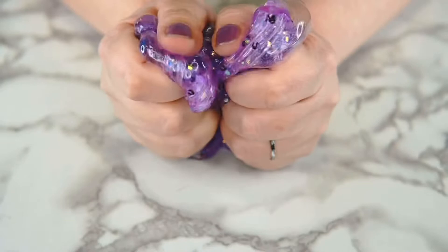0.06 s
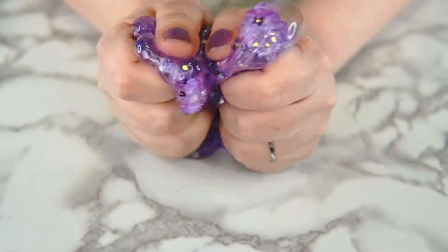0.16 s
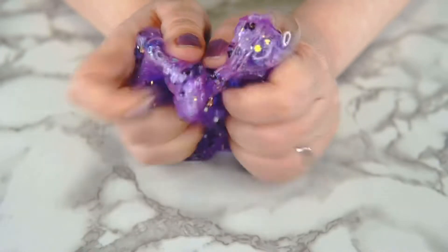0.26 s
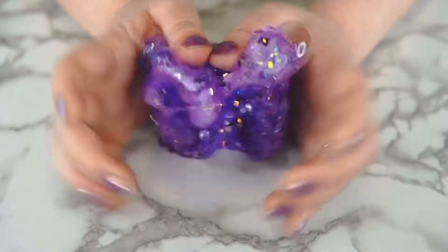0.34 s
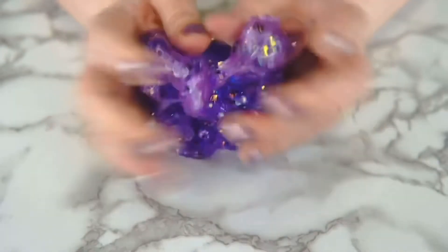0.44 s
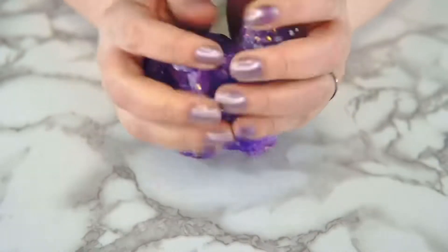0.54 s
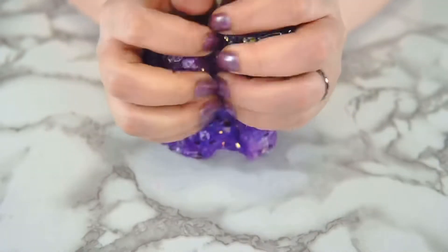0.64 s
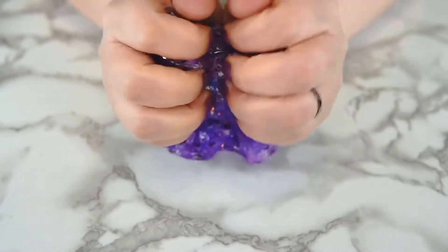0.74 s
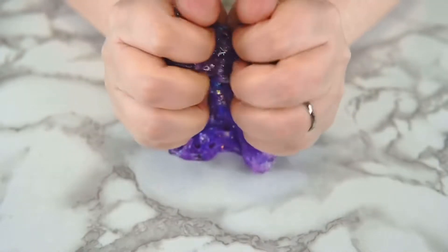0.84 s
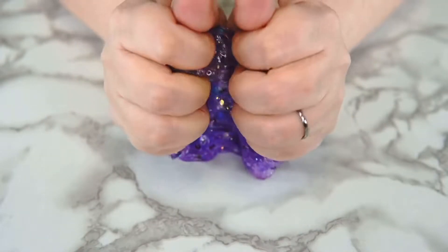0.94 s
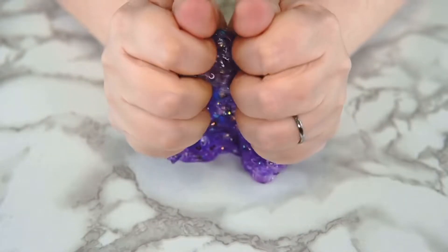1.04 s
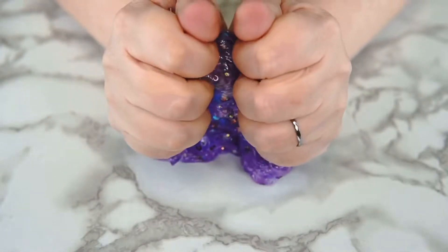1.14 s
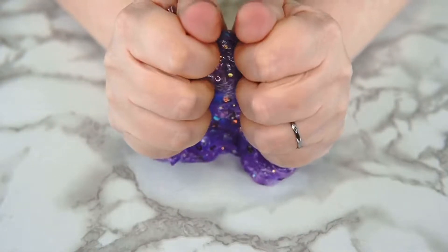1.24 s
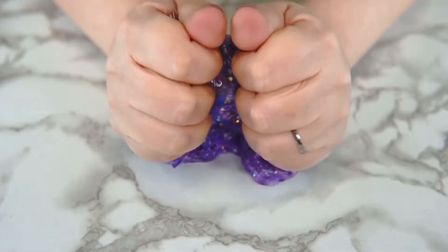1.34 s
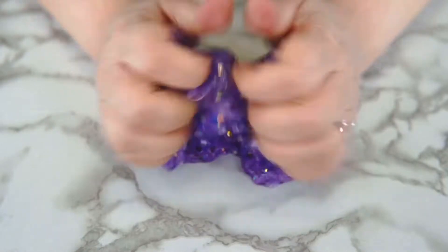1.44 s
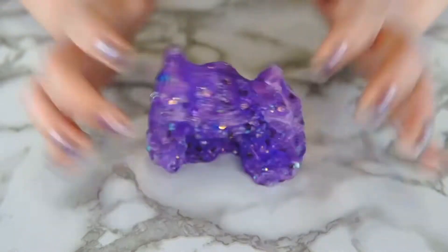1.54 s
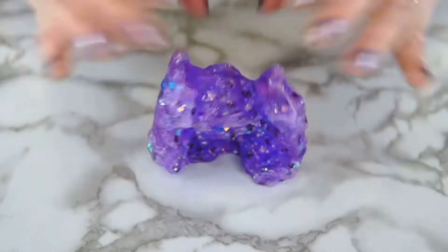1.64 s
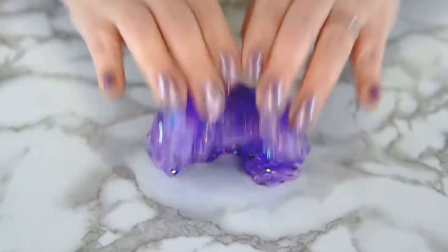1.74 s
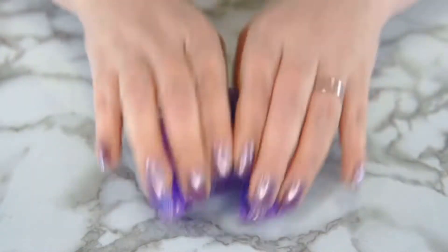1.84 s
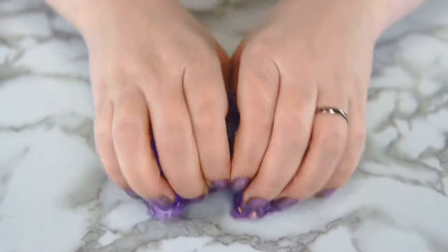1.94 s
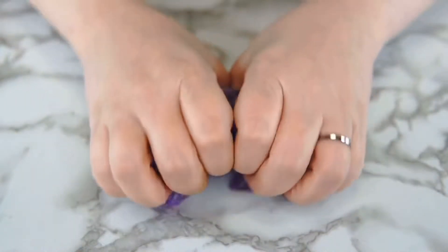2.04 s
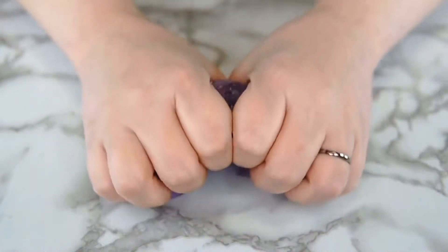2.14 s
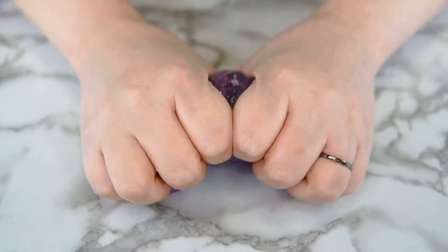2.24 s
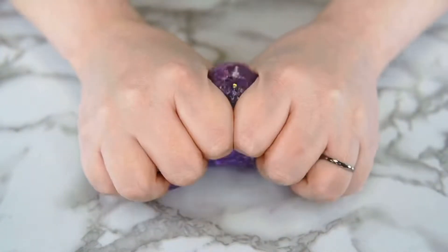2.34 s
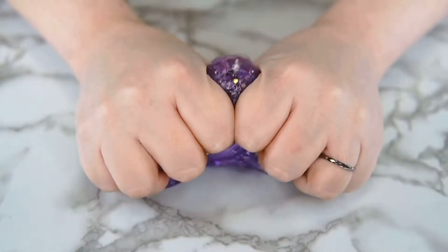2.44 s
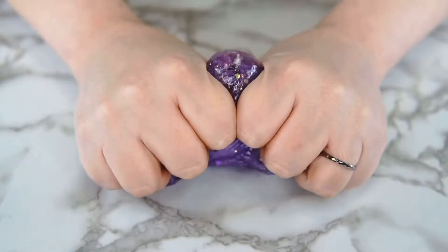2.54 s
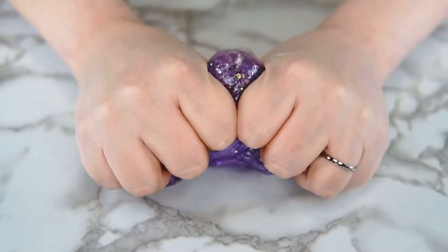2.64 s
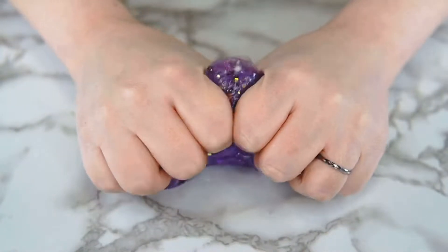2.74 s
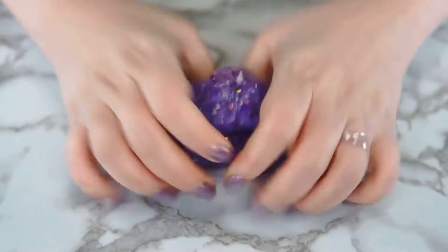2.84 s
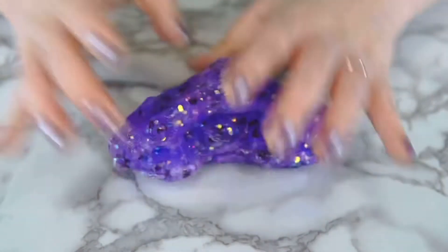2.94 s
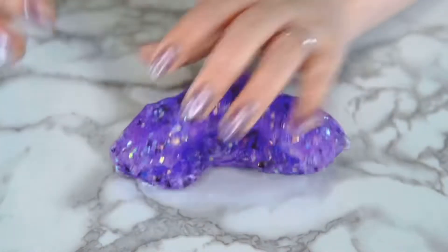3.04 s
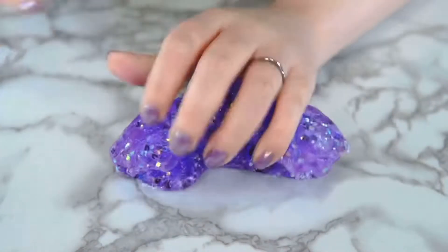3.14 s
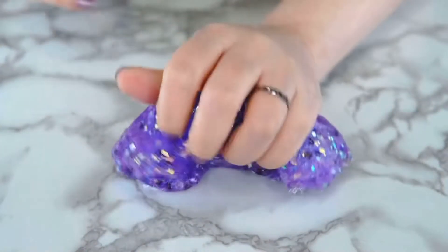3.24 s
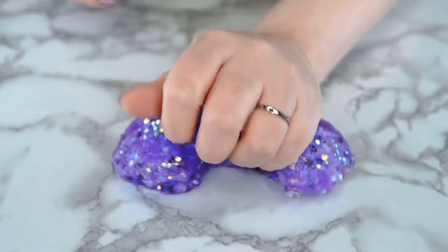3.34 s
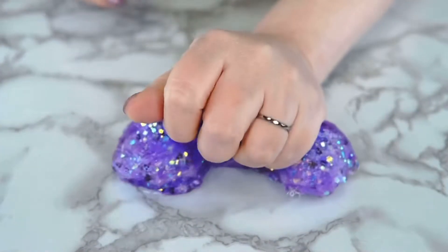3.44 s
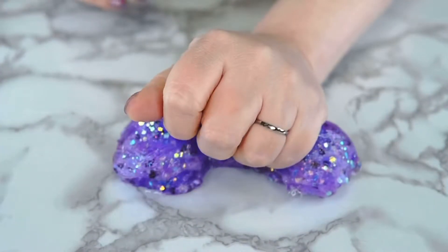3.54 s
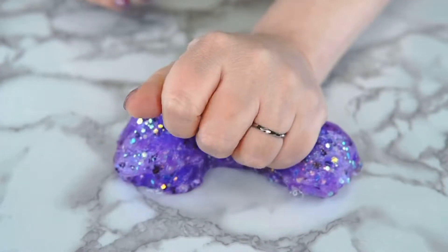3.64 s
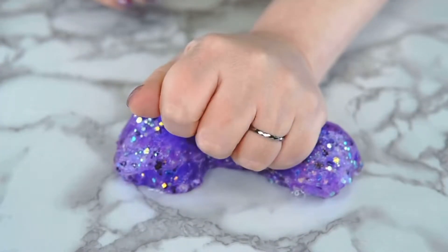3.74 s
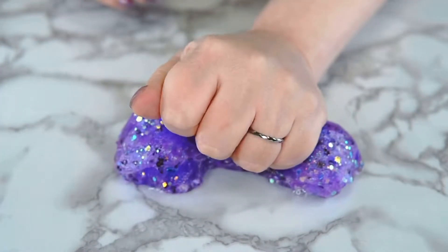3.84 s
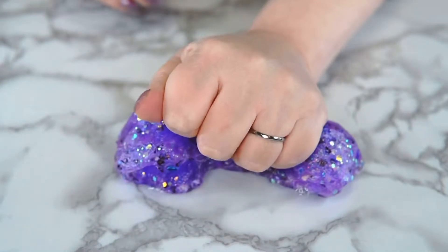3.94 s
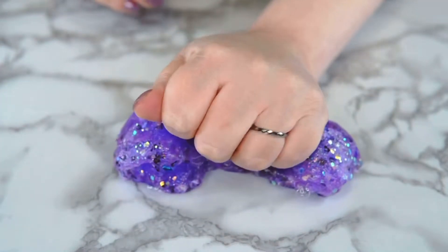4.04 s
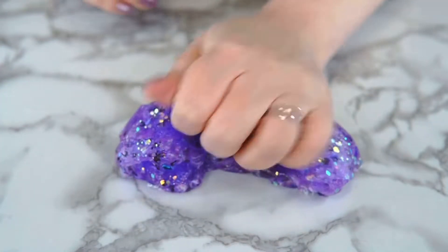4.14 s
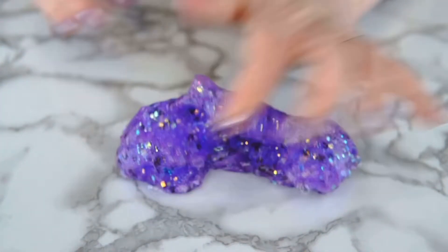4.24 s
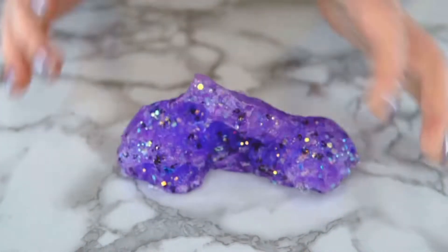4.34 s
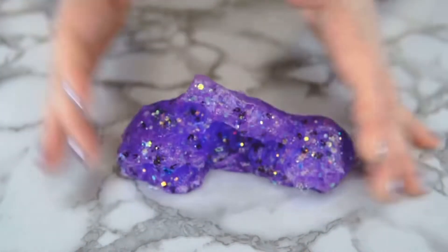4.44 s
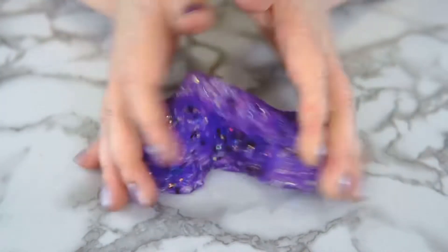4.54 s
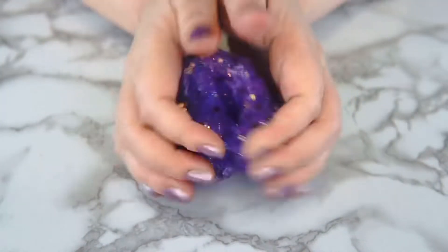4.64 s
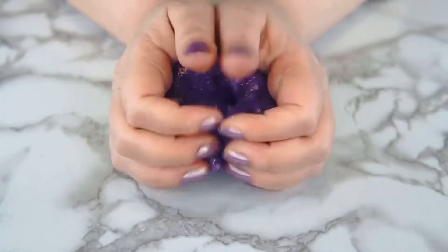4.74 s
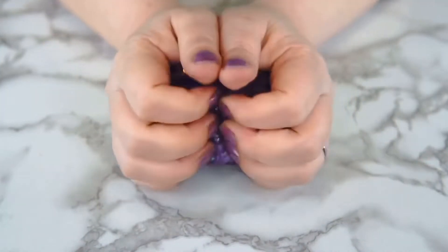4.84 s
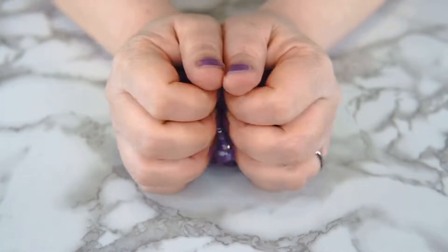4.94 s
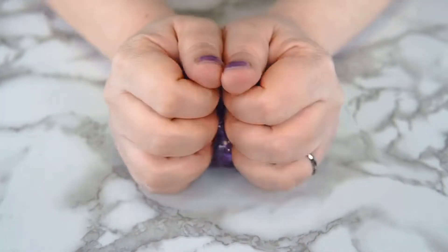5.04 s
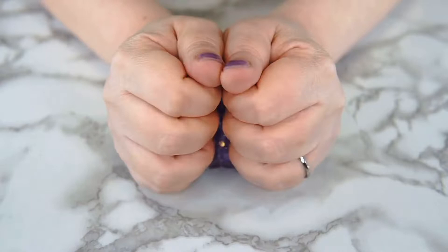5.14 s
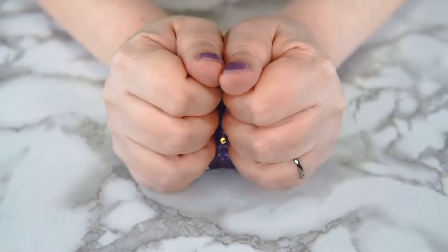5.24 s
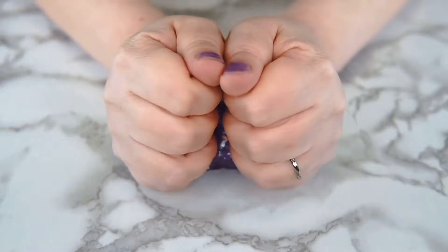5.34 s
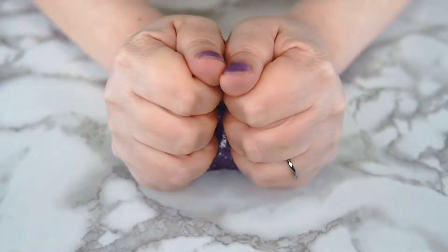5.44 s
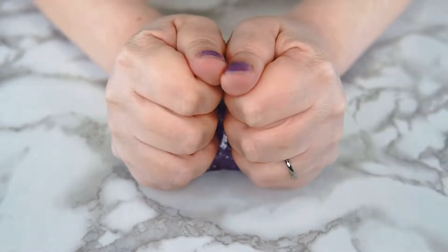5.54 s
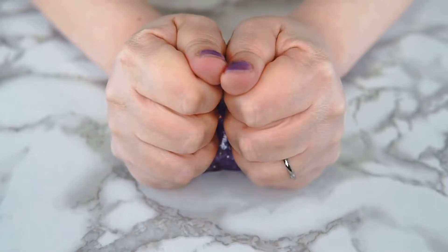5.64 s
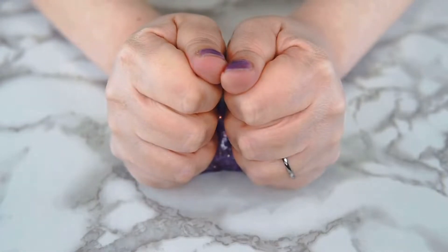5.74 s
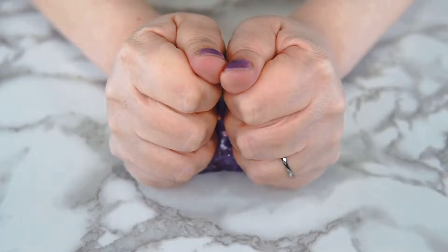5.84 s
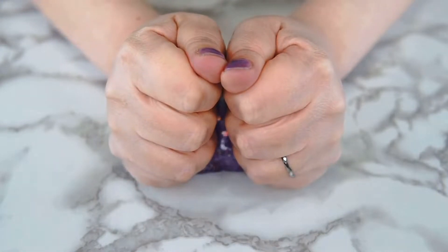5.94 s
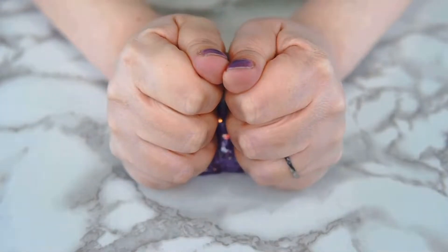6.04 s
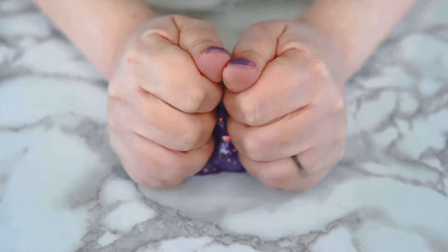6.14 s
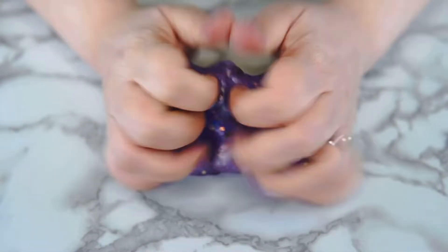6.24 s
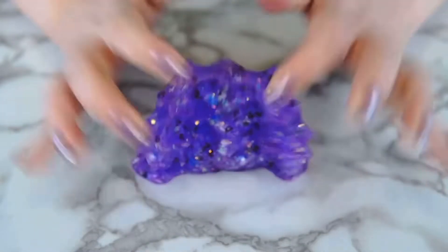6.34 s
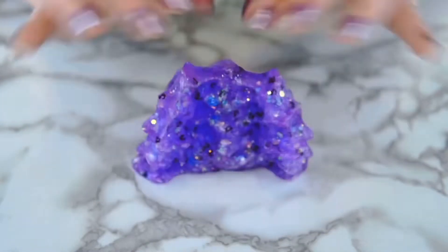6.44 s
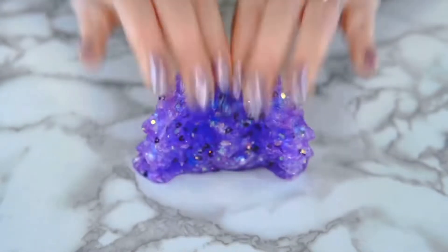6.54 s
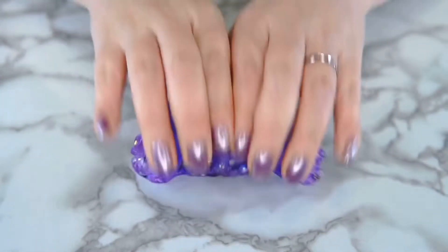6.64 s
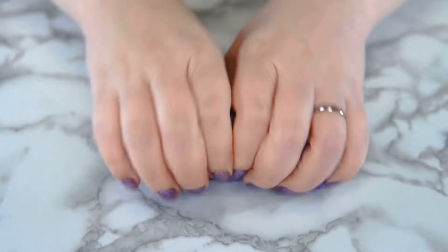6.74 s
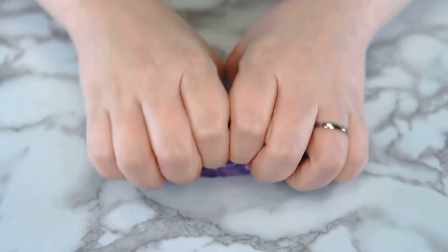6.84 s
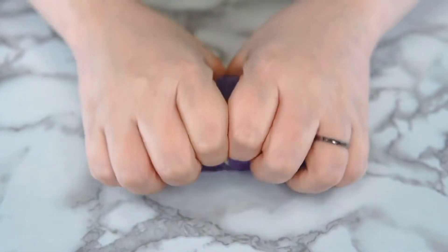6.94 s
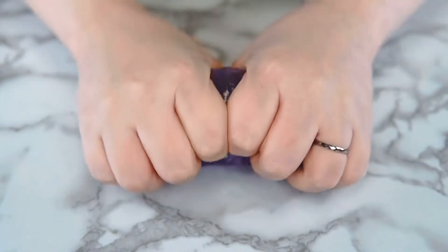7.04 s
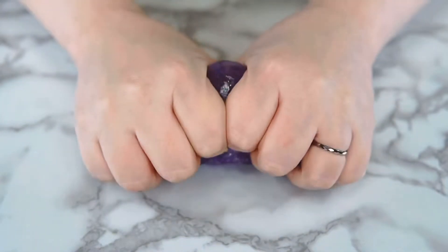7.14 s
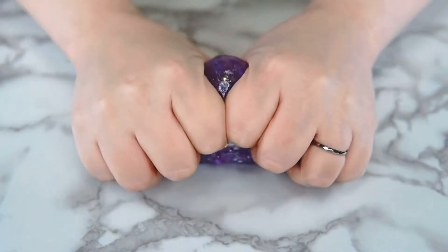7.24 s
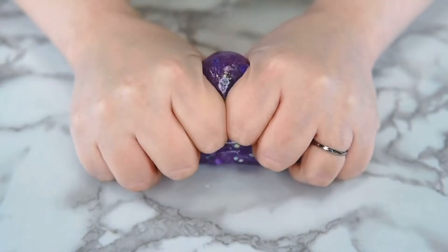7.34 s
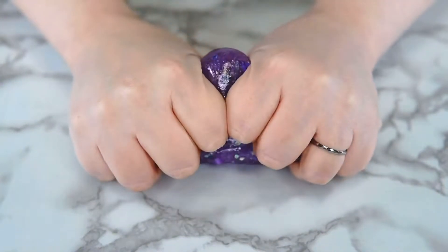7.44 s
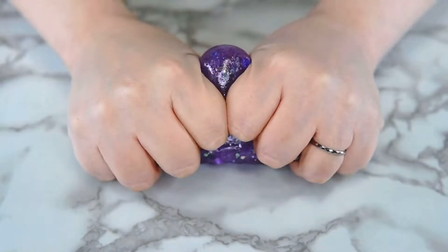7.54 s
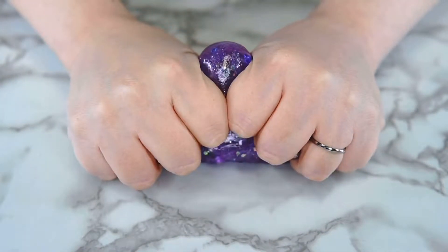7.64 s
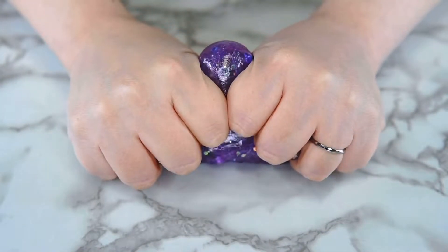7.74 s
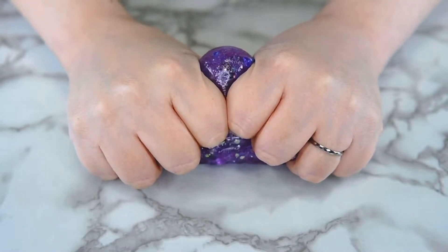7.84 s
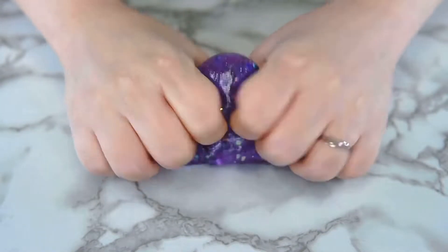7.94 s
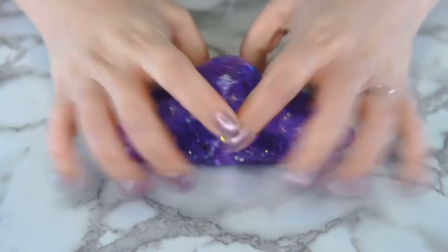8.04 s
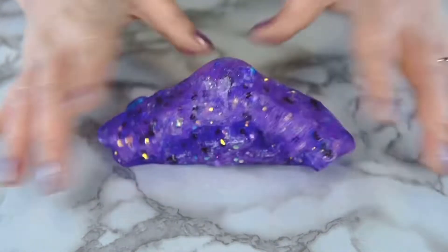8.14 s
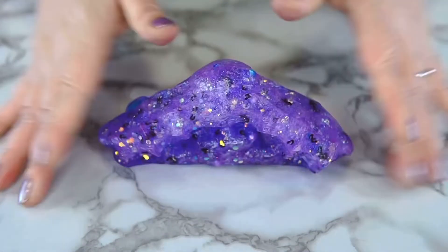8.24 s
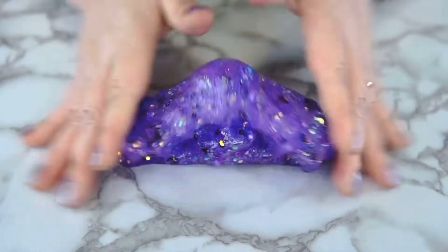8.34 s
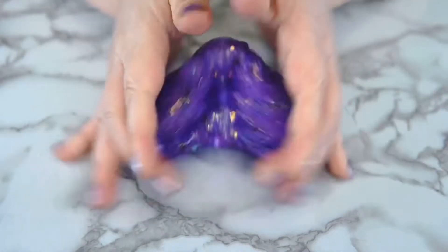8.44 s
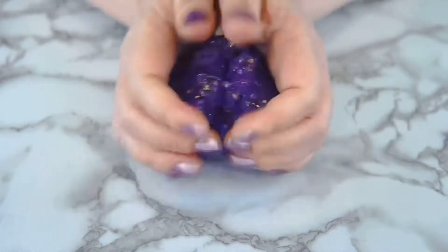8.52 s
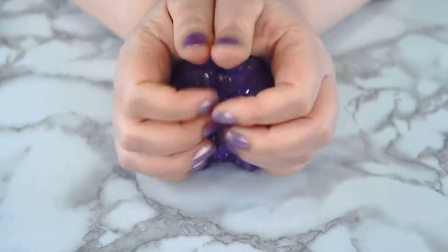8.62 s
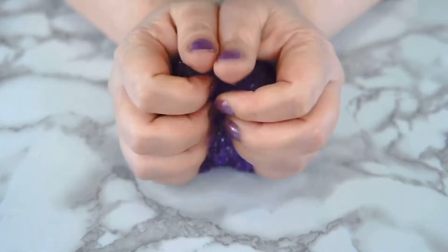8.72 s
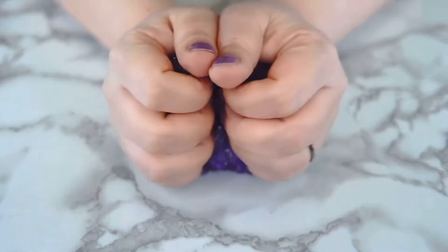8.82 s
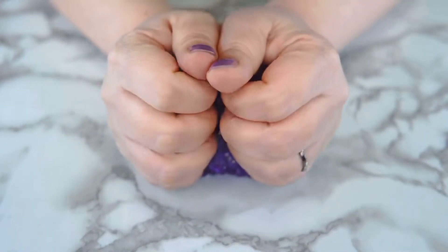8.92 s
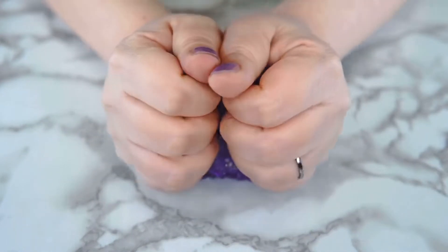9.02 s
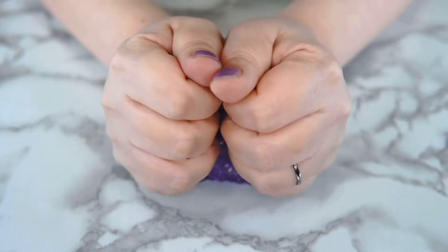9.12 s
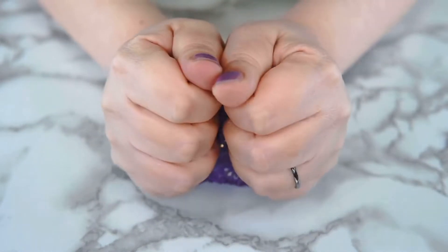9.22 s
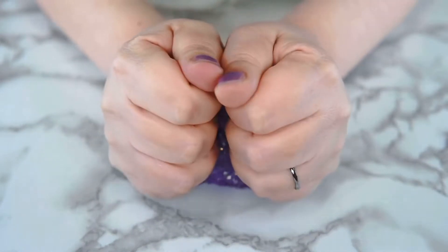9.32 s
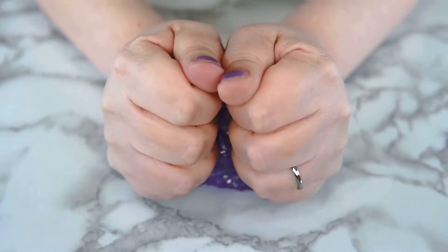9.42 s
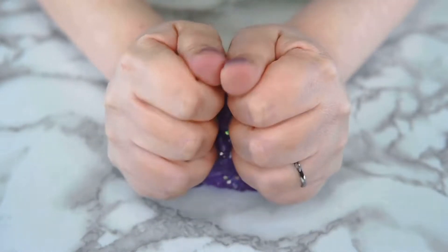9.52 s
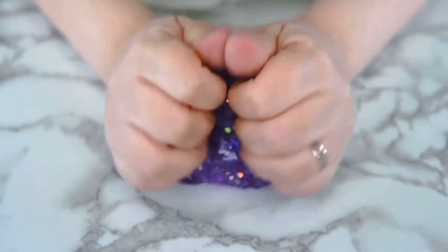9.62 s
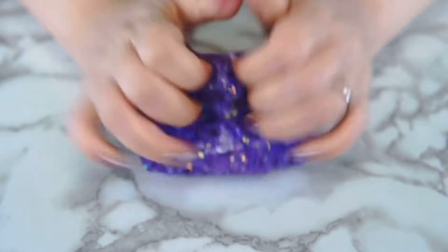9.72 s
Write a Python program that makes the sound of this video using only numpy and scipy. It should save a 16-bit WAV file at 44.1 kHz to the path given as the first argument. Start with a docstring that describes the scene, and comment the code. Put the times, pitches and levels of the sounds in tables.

```python
"""Two hands knead glitter slime on a table, close to a stereo microphone in a small, dry room.
First the fingers peel off the sticky mass: a dense, tearing crackle of short resonant ticks and hiss.
Then a squeeze bursts trapped air pockets: each a sharp snap, a quick falling chirp and a puff of air.
Peels and groups of pops go on in turn, the longest from 4.5 to 6.1 s, the last pops fainter, then a peel.
Faint squelching, soft landings and low thumps under loud pops lie beneath, over a very faint, dark hiss."""
import sys
import numpy as np
from scipy import signal
from scipy.fft import rfft, irfft, next_fast_len
from scipy.io import wavfile
from scipy.ndimage import uniform_filter1d, minimum_filter1d, map_coordinates

SR = 44100
rng = np.random.default_rng(int(sys.argv[2]) if len(sys.argv) > 2 else 0)


def output_pcm(signal):
    """Save a mono or channel-first signal as 16-bit PCM at the path in sys.argv[1].

    Samples are clipped to [-1, 1] before scaling.
    """
    pcm = np.clip(np.atleast_2d(signal).T, -1, 1) * 32767
    wavfile.write(sys.argv[1], SR, np.round(pcm).astype(np.int16))


N = 431298  # samples, about 9.8 s

# The larger air pockets bursting, levels ahead of the trims in pops(). Each row: start in seconds,
# snap level in dB, snap pitch in Hz, chirp level in dB, chirp centre in Hz, chirp spread in octaves,
# room level against the pop in dB.
POPS = [(.652, -59, 6790, -38, 955, 0.55, -2), (0.7127, -39.5, 6700, -17, 800, 0.47, 1.5),
        (0.7158, -51, 6460, -26.5, 2800, 0.14, -3), (0.8086, -17.5, 5730, -15.5, 2350, 0.68, 2.5),
        (0.8503, -32, 7100, -14, 2200, 0.54, 3), (0.8566, -26.5, 6800, -14.5, 2370, 0.57, -7),
        (.933, -27.5, 5300, -19, 1320, 0.43, -5), (.9705, -21.5, 9300, -26.5, 1870, 0.91, -7),
        (0.9865, -4, 7940, -16, 2660, 0.31, -4), (1.0483, -7.5, 8300, -19.5, 2880, 0.19, -6),
        (1.0773, -2, 7540, -22.5, 3380, 0.66, -5.5), (1.1246, -9.5, 8800, -23.5, 2720, 0.37, -6.5),
        (1.1395, -29, 7800, -29, 2680, 0.41, -3), (1.2145, -14.5, 7670, -17.5, 2590, 0.49, -3.5),
        (1.93, -32.5, 7360, -30, 3140, 0.32, 2.5), (1.995, -23, 6600, -25, 3380, 0.53, 5.5),
        (2.01, -17, 9600, -19.5, 2210, 0.43, -3.5), (2.024, -3, 9300, -26, 2640, .8, -4),
        (2.0985, -33, 7900, -37, 2570, .42, 5), (2.1219, -40, 7000, -28.5, 1980, 1.2, 3.5),
        (2.1595, -19, 6100, -14.5, 1800, 0.39, -2.5), (2.1916, -13, 7000, -23.5, 2610, 0.34, -7.5),
        (2.2289, -15, 7000, -34.5, 3420, 0.5, -12.5), (2.3065, -15.5, 5780, -12, 1830, 0.39, -4.5),
        (2.3312, -14, 6630, -30, 2360, .77, 1), (2.3421, -12.5, 8400, -12, 2050, 0.36, -2),
        (2.3849, -27, 7900, -51, 2330, 0.64, -12), (2.4183, -11, 8900, -11, 1930, 0.37, 0),
        (2.449, -18, 7900, -23.5, 2550, 0.66, -4.5), (2.4711, -10, 6470, -30.5, 2500, 0.86, -3.5),
        (2.4736, -10, 6630, -7.5, 2435, 0.45, -3.5), (2.479, -4.5, 8030, -22, 2510, 0.52, -8),
        (2.5159, -15.5, 9500, -18.5, 2720, 0.55, 2.5), (2.7271, -22.5, 8000, -29.5, 2830, 0.3, -2.5),
        (3.334, -17.5, 6900, -28.5, 3190, 0.36, -8.5), (3.447, -36, 9200, -25, 1770, 0.34, -7.5),
        (3.519, -23.5, 6250, -26.5, 1280, 0.49, -0.5), (3.56, -14.5, 6000, -24.5, 3350, 0.7, 6.5),
        (3.5747, -6.5, 8400, -21.5, 2300, 0.9, -14), (3.5776, -38, 6570, -14, 1000, 0.39, -3.5),
        (3.6743, -3.5, 7580, -26.5, 3820, .67, -7), (3.7665, -32.5, 6600, -26, 1550, 0.51, 0.5),
        (3.8008, -33, 8200, -27.5, 3290, 0.27, -7), (3.8735, -34, 6670, -29, 2400, 0.32, -11),
        (4.5644, -18.5, 9200, -31.5, 2330, 0.63, -2.5), (4.6691, -16, 7200, -29, 2330, 0.49, -7),
        (4.6883, -18.5, 7200, -19.5, 2730, 0.28, -6.5), (4.7627, -15.5, 7740, -35.5, 3100, 0.42, -5.5),
        (4.8164, -21, 5230, -14.5, 1450, 0.4, -6.5), (4.819, -45, 6000, -29, 743, 0.62, -1),
        (4.878, -16, 6500, -13, 3060, 0.39, 2), (4.8864, -13, 7060, -22, 2540, 0.62, -12),
        (4.8968, -8, 8800, -26, 3360, 0.5, -7.5), (4.9475, -22.5, 8200, -30.5, 2510, 0.41, -14),
        (4.9993, -37, 6100, -33, 3240, 0.3, -5.5), (5.0427, -37, 6800, -42.5, 3550, 0.3, 13),
        (5.0552, -30, 7000, -29.5, 2900, 0.38, 0), (5.0759, -22, 7300, -22.5, 3010, .26, -7.5),
        (5.102, -23, 10700, -34.5, 2500, 0.61, 4.5), (5.1146, -20, 8850, -41, 2900, 0.66, -13),
        (5.1362, -12, 6800, -16, 2600, .51, -0.5), (5.1407, -13, 6470, -11, 3700, .46, -2),
        (5.1452, -13, 8340, -18.5, 3020, 0.27, -23.5), (5.1477, -40, 6600, -34, 516, 0.59, 1),
        (5.2376, -21, 10200, -28, 2860, 0.4, -2.5), (5.2731, -31, 6060, -26.5, 2590, .88, 1.5),
        (5.3196, -21, 6900, -33, 3500, 0.82, 12), (5.3285, -12.5, 6440, -25.5, 2600, 0.76, -11.5),
        (5.33, -42, 6500, -39, 430, 0.3, -3), (5.3675, -27.5, 7140, -33.5, 3150, 0.29, 7),
        (5.401, -17, 10700, -27, 2560, 0.33, 2), (5.4103, -14, 6100, -13.5, 2930, 0.48, -1.5),
        (5.4529, -8.5, 9300, -18, 2900, 0.41, -3), (5.5171, -49, 7700, -28.5, 2600, 0.45, -4.5),
        (5.5651, -16, 8400, -23.5, 2490, 0.35, -6.5), (5.637, -21.5, 10900, -67, 3250, 0.2, -10),
        (5.7227, -55, 6200, -30.5, 1090, 0.38, -4), (5.7986, -32.5, 11240, -49, 3020, 0.33, -5),
        (5.922, -27, 11840, -44, 3290, 0.2, -4), (6.131, -28.5, 6700, -17.5, 2090, 0.35, -8),
        (6.7468, -40, 6360, -38.5, 3020, 0.39, 0.5), (6.796, -31.5, 6000, -34, 2360, 0.24, -1.5),
        (6.813, -24.5, 8400, -23, 2730, 0.32, -6), (6.8607, -51, 6900, -27.5, 2160, 0.3, -7),
        (6.889, -26, 9800, -42, 2160, 0.24, 0.5), (6.945, -29.5, 6600, -27, 2410, 0.24, 5),
        (6.9645, -19.5, 6100, -28, 2570, 0.5, -2), (7.0133, -15.5, 7250, -32, 2200, 0.47, -1.5),
        (7.023, -31, 7600, -30, 1930, .45, -3), (7.0474, -20, 7700, -31.5, 3060, 0.67, -3),
        (7.0887, -4, 7970, -26, 2540, 0.53, -14.5), (7.1385, -50, 7040, -29, 1840, 0.52, 1.5),
        (7.1832, -25.5, 7260, -30.5, 2830, 0.39, -12), (7.251, -14, 10440, -53.5, 3500, .3, -4),
        (7.3993, -3, 7400, -23.5, 2320, 0.86, -7), (7.4485, -28.5, 5570, -16.5, 2600, 0.33, 4),
        (7.51, -12, 8370, -34.5, 3360, .77, -8.5), (7.5175, -22.5, 6900, -23, 2330, 0.52, -6.5),
        (7.5786, -9, 7220, -22, 3530, 0.26, -1), (7.6853, -62, 6970, -48, 2290, 0.36, -22),
        (7.856, -31.5, 7900, -51, 2420, .38, -5), (8.5647, -42, 5660, -36, 2340, 0.25, -5),
        (8.6928, -42.5, 6670, -32, 2070, 0.28, -7), (8.7322, -30, 5900, -27.5, 2070, 0.24, -7.5),
        (8.7509, -54, 6100, -35, 2060, 0.18, -15), (8.8374, -29, 6900, -22.5, 2900, .12, -7),
        (8.8131, -37, 9100, -44.5, 2730, 0.34, 4), (8.9021, -19.5, 8100, -41.5, 3000, 0.65, -6),
        (8.9429, -39, 7500, -36.5, 2250, 0.29, -2), (9.066, -30, 10700, -41.5, 3200, 0.74, 3.5),
        (9.088, -7.5, 7230, -23, 3600, 0.62, -0.5), (9.2555, -20.5, 9360, -29, 2670, 0.37, -7),
        (9.2607, -63, 7600, -19, 2900, 0.25, -8), (9.3122, -23.5, 8700, -23, 2860, 0.29, -9),
        (9.3568, -29.5, 11600, -45, 3120, .3, -10), (9.4865, -25.5, 7730, -27, 2870, 0.2, -6)]
# The fingers tighten in waves, a few to a squeeze. Each row: start of full grip in seconds, hold in seconds,
# attack in seconds, release in seconds, squelch level in dB, fizz level in dB, ahead of the trims in squeezing().
SQUEEZES = [(0.658, 0.097, 0.28, 0.29, -62.5, -65.5), (0.825, 0.1, 0.3, 0.5, -49, -54.5),
            (0.968, 0.2, 0.072, 0.21, -52, -48), (1.97, 0.16, 0.29, 0.31, -42.5, -41.5),
            (2.151, 0.13, 0.085, 0.21, -51.5, -54.5), (2.332, .21, 0.16, 0.14, -44, -43),
            (3.331, 0.014, .2, 0.38, -69, -69.5), (3.53, 0.12, 0.29, 0.3, -53.5, -49.5),
            (3.675, .13, 0.12, 0.28, -61, -60.5), (4.489, 0.1, 0.12, 0.099, -55, -49.5),
            (4.695, 0.27, 0.44, 0.17, -56.5, -53.5), (5.062, 0.091, 0.13, 0.23, -51.5, -46),
            (5.27, 0.2, 0.21, 0.36, -52.5, -44.5), (5.518, 0.38, 0.23, 0.19, -74, -67),
            (6.772, .04, 0.24, 0.13, -51.5, -50), (6.899, .21, 0.18, 0.6, -50, -49.5),
            (7.169, .17, .1, 0.42, -59, -60.5), (7.409, 0.18, 0.16, 0.15, -55.5, -49),
            (8.44, 0.28, .2, .2, -67.5, -74.5), (8.721, 0.19, 0.097, 0.27, -61, -68),
            (8.933, .44, .1, .05, -65.5, -60)]


def pops(rows, chirp_gain_db=-1.0, turns=1.91, puff_s=0.00027, pan_db=0.46, size=1024):
    """Each air pocket snaps, chirps downward, rings and lets out a puff; the room answers."""
    puff_of_snap_db, puff_of_chirp_db = -49.5, -42.5
    pocket_hz, puff_grows = 2400, 1.5  # pockets pitched below pocket_hz puff harder after their chirp
    lead_in_s = .0002
    out, t = np.zeros((2, N)), np.arange(size) / SR
    chance = rng.standard_normal((len(rows), size))
    for row, luck, tail in zip(rows, chance, room_tails(len(rows))):
        s, snap_db, snap_hz, chirp_db, chirp_hz, spread, room_db = row
        held = 1 / (1 + (spread / 0.33) ** 6)  # the less its pitch falls, the more a pocket rings
        snap_puff = amp(snap_db + puff_of_snap_db)
        chirp_puff = amp(chirp_db + puff_of_chirp_db) * (pocket_hz / chirp_hz) ** puff_grows
        pop = burst(snap(t, snap_hz, luck, cycles=0.53, crack=0.26, edge_hz=3620), snap_db)
        falling = chirp(t, chirp_hz, spread, turns * np.exp(.2 * luck[-1]))
        pop += burst(falling, chirp_db + chirp_gain_db) / np.sqrt(1 + held ** 2)
        pop += held * burst(bubble(t, chirp_hz, cycles=4.8), chirp_db)
        puff = t * (1 - 0.92 * t / puff_s) * np.exp(-t / puff_s)
        pop += (snap_puff + chirp_puff) * burst(puff, 0)
        left_right = amp(pan_db * luck[-2] * np.array([[1], [-1]]))
        add(out, pop * left_right, s - lead_in_s)
        answer = signal.fftconvolve(pop[None], tail, axes=1)
        add(out, amp(room_db) * answer, s - lead_in_s)
    return out


def snap(t, hz, chance, cycles, crack, edge_hz, reach=2.36):
    """The film breaks: a few ragged cycles of a high tone, too small for bass, dull far above its pitch."""
    u = t * hz / cycles
    tick = u * np.exp(-u) * (np.sin(2 * np.pi * hz * t) + crack * chance)
    top_hz = np.clip(reach * hz, 2 * edge_hz, SR / 2 - 1000)
    band = signal.butter(2, [edge_hz, top_hz], "bandpass", fs=SR, output="sos")
    return signal.sosfilt(band, tick)


def chirp(t, hz, spread, turns):
    """The hole widens, so that the pitch falls as turns / age; loudest around hz."""
    age = t + 1 / SR
    pitch = turns / age
    swell = np.sqrt(pitch) / np.cosh(0.67 * np.log2(pitch / hz) / max(spread, .2))
    swell = swell / np.sqrt(1 + (pitch / 5200) ** 8 + (330 / pitch) ** 6)  # the hole's smallest and widest size
    return swell * np.sin(2 * np.pi * turns * np.log(age * hz)) * (pitch < SR / 3)


def bubble(t, hz, cycles):
    """A pocket that keeps its shape rings on at one pitch."""
    return np.sin(2 * np.pi * hz * t) * np.exp(-t * hz / cycles) * (1 - np.exp(-t * hz))


def burst(x, db):
    """Scale a short sound to a level taken over one millisecond."""
    return amp(db) * x / np.sqrt(np.sum(x ** 2) * 1000 / SR + 1e-20)


def small_pops(grip, snap_db=12, chirp_db=14, scatter_db=3, snap_hz=7300, chirp_hz=2400, octaves=.28,
               spread=.38, room_db=-3, count=4):
    """Small pockets burst at chance moments of every squeeze, louder the firmer the grip; rows like POPS."""
    rows = []
    for start, hold, *_ in SQUEEZES:
        times = start + hold * (np.arange(count) + rng.random(count)) / count
        for s, luck in zip(times, rng.standard_normal((count, 4))):
            body_db, fizz_db = 20 * np.log10(grip[:, min(int(s * SR), N - 1)])
            rows.append((s,
                         fizz_db + snap_db + scatter_db * luck[0], snap_hz * 2 ** (octaves * luck[1] / 2),
                         body_db + chirp_db + scatter_db * luck[2], chirp_hz * 2 ** (octaves * luck[3]),
                         spread, room_db))
    return rows


def low_thumps(push_s=0.00043, rebound=0.74, size=1024):
    """A low thump under some of the loudest pops: one push and its rebound, with no ring."""
    # Each row: start in seconds, thump level in dB as rms over 1 ms.
    thumps = [(.9867, -45.5), (2.0248, -39.5), (2.48, -45.5), (3.6742, -47.5), (5.4533, -36.5),
              (7.0905, -51.5), (7.398, -49.5)]
    out, t = np.zeros((2, N)), np.arange(size) / SR
    for s, db in thumps:
        add(out, burst(t * (1 - rebound * t / push_s) * np.exp(-t / push_s), db), s)
    return out


def peeling():
    """Skin pulls free: thousands of threads part each second."""
    # Fingers peeling off or dragging. Each row: start of full pull in seconds, hold in seconds, attack in
    # seconds, release in seconds, tearing level in dB, fizz level in dB, ahead of the trims below.
    peels = [(0.0, 0.018, .15, 0.24, -44, -56), (.222, 0.072, 0.14, 0.11, -30.5, -36.5),
             (.376, 0.014, 0.087, 0.19, -45.5, -60.5), (.53, 0.018, 0.14, 0.11, -65, -69.5),
             (1.44, 0.043, 0.21, 0.1, -33, -34.5), (2.765, 0.074, 0.14, .12, -28.5, -34),
             (2.95, 0.36, .1, .2, -68, -84), (3.135, 0.0061, 0.065, .2, -49.5, -46),
             (4.103, 0.064, 0.14, 0.093, -29, -33.5), (6.183, 0.042, 0.2, 0.12, -28.5, -29.5),
             (6.558, .025, 0.13, 0.15, -60, -66), (6.628, 0.002, 0.064, 0.036, -60, -53),
             (7.912, .055, .17, .125, -27.5, -33), (8.38, .015, 0.12, 0.1, -48.5, -49),
             (9.555, 0.053, .07, 0.083, -47, -52), (9.635, 0.11, 0.13, 0.18, -38.5, -41.5)]
    # Colour of the tearing. Each row: frequency in Hz, relative level in dB.
    tearing = [(71, -23), (120, -27.5), (405, -14), (574, -17), (663, -8.5), (1230, -4), (1340, -0.5),
               (2060, -3.5), (2690, -4), (3110, -3.5), (5100, -2), (6670, 2.5), (14000, -8.5), (15200, -18),
               (16500, -83)]
    grains = crackle(rate=7000, scatter_db=3.5, clump_db=3.0, sharpness=2.5, wet_db=-5.5, hiss_db=-4.0)
    return sticky(grains, tearing, effort(peels), body_db=-1.5, fizz_db=2.0, split_hz=3850)


def squeezing(grip):
    """Pressed slime ticks with sparse small bubbles."""
    # Colour of the squelch. Each row: frequency in Hz, relative level in dB.
    squelch = [(88, -71), (150, -33.5), (336, -28), (798, -11), (864, -14.5), (1160, -5), (1720, -6),
               (2050, -6), (2700, -8.5), (4080, -13), (4870, -10.5), (8790, -9), (10500, -14), (15300, -22),
               (16500, -45.5)]
    grains = crackle(rate=600, scatter_db=7, clump_db=3.5, sharpness=7, wet_db=-1, hiss_db=-10)
    return sticky(grains, squelch, grip + refill(), body_db=3, fizz_db=2.5, split_hz=4000)


def refill(squelch_db=-37, fizz_db=-39.5, decay_s=.021):
    """Gains of extra crackle after each larger burst, dying away as slime rushes into the pocket."""
    kicks = np.zeros((2, N))
    for s, snap_db, _, chirp_db, *_ in POPS:
        add(kicks, amp([[chirp_db + squelch_db], [snap_db + fizz_db]]), s)
    return signal.lfilter([1], [1, -np.exp(-1 / (decay_s * SR))], kicks)


def crackle(rate, scatter_db, clump_db, sharpness, wet_db, hiss_db, count=14):
    """Tiny bubbles of many sizes break in clumps, each ringing briefly at its own pitch; rms 1."""
    ticks = np.zeros(N)
    clumps = amp(clump_db * np.clip(wobble(70), -2, 2))
    for hz in np.geomspace(450, 14000, count):
        places = rng.integers(0, N, int(rate / count * N / SR))
        sizes = amp(scatter_db * np.clip(rng.standard_normal(len(places)), -3, 2))
        sizes = sizes * rng.choice([-1, 1], len(places))
        clicks = np.bincount(places, sizes, N) * clumps
        ticks += signal.lfilter(*signal.iirpeak(hz, sharpness, fs=SR), clicks)
    hiss = unit(clumps * scattered(rng.standard_normal((2, N))))
    return unit(unit(ticks) + amp(wet_db) * unit(reflections(ticks)) + amp(hiss_db) * hiss)


def sticky(grains, spectrum, strokes, body_db, fizz_db, split_hz):
    """Crackle shaped by the slime: its low body and its high fizz each follow the strokes."""
    body, fizz = strokes
    colour = lambda hz: amp(along(spectrum, hz))
    low = lambda hz: 1 / (1 + (hz / split_hz) ** 6)
    dull = unit(filtered(grains, lambda hz: colour(hz) * low(hz)))
    bright = unit(filtered(grains, lambda hz: colour(hz) * (1 - low(hz))))
    return amp(body_db) * body * dull + amp(fizz_db) * fizz * bright


def effort(rows, uneven_db=0.92):
    """Gains of the body and the fizz of the crackle over a series of strokes; the slime gives way unevenly."""
    t = np.arange(N) / SR
    coarse = t[::40]
    strokes = sum(amp([[body_db], [fizz_db]]) * stroke(coarse, *timing)
                  for *timing, body_db, fizz_db in rows)
    smooth = np.array([np.interp(t, coarse, gain) for gain in strokes])
    return smooth * amp(uneven_db * wobble(35))


def stroke(t, start, hold, attack, release):
    """Gain of one hand movement: it swells by 60 dB over the attack, holds, and dies by as much over the release."""
    away = np.maximum(start - t, 0) / attack + np.maximum(t - start - hold, 0) / release
    return amp(-60 * np.minimum(away, 3))


def wobble(rate):
    """A smooth random curve, rate knots a second."""
    knots = rng.standard_normal(int(N * rate / SR) + 4)
    return map_coordinates(knots, [np.arange(N) * rate / SR])


def table(grip, thud_db=-3, press_db=-29):
    """The table top rumbles under pressing hands and swells at each soft landing."""
    # The lump and the hands settle softly. Each row: middle in seconds, level in dB ahead of the thud_db
    # trim, half length (one sigma of the swell) in seconds.
    thuds = [(0.32, -66, 0.029), (1.495, -68, 0.036), (2.835, -60.5, 0.038), (4.186, -68, 0.057),
             (6.274, -62, 0.044), (8.007, -63, 0.054), (8.228, -66, 0.021), (9.681, -73.5, 0.14)]
    # Colour of the rumble. Each row: frequency in Hz, relative level in dB.
    rumble = [(10, -22), (30, -12.5), (70, -4), (120, 3), (220, -4), (450, -12.5), (1200, -49.5)]
    t = np.arange(N) / SR
    landings = sum(amp(db + thud_db) * np.exp(-.5 * ((t - s) / half) ** 2) for s, db, half in thuds)
    noise = filtered(scattered(rng.standard_normal((2, N))), lambda hz: amp(along(rumble, hz)))
    return (landings + amp(press_db) * grip[0]) * unit(noise)


def background(level_db=-94):
    """A very faint, dark hiss: noise that thins out above 150 Hz."""
    noise = rng.standard_normal((2, N))
    return amp(level_db) * unit(filtered(noise, lambda hz: 1 / np.sqrt(1 + hz / 150)))


def reflections(x, count=30):
    """Room reverberation of the crackle, drawn as a new random tail for each stretch."""
    out, step = np.zeros((2, N)), N // count + 1
    for k, tail in enumerate(room_tails(count)):
        stretch = x[None, k * step:(k + 1) * step]
        add(out, signal.fftconvolve(stretch, tail, axes=1), k * step / SR)
    return out


def room_tails(count, size=8192):
    """Stereo room reverberation as decaying noise, count random draws of it."""
    # Reverberation. Each row: frequency in Hz, time to fall by 60 dB in seconds.
    decay = [(150, 0.11), (500, 0.14), (2000, 0.12), (7000, 0.085), (15000, 0.086)]
    # Strength of the reflections. Each row: frequency in Hz, level in dB.
    walls = [(60, -14.5), (250, -11.5), (500, -4), (2000, -5), (4000, 1.5), (8000, -4.5), (15000, -1)]
    noise = scattered(rng.standard_normal((2, count * size)))
    noise = noise.reshape(2, count, size).swapaxes(0, 1)
    hz, t, z = signal.stft(noise, SR, nperseg=256)
    fading = amp(-60 * t / along(decay, hz)[:, None])
    tails = signal.istft(z * fading, SR, nperseg=256)[1]
    tails = tails * (1 - np.exp(-(np.arange(tails.shape[-1]) / SR / 0.00013) ** 2))  # soft onset
    tails = tails / np.sqrt(np.mean(np.sum(tails ** 2, axis=-1)))  # mean energy 1 ahead of the colouring
    return filtered(tails, lambda hz: room_modes(hz) * amp(along(walls, hz)))


def room_modes(hz):
    """A flat path plus a few fixed resonances of the room."""
    # Each row: centre in Hz, width in Hz, strength in dB against the flat path.
    resonances = [(394, 71, 0.5), (530, 26, 5.5), (1020, 200, -12), (2050, 79, 6.5)]
    return 1 + sum(amp(db) * 1j * hz * w / (c * c - hz * hz + 1j * hz * w) for c, w, db in resonances)


def scattered(pair):
    """Two unrelated signals become a partly alike left and right."""
    # Scattered sound. Each row: frequency in Hz, left-right likeness from 0 to 1.
    alike = [(100, 0.97), (500, 0.2), (1500, 0.6), (3000, 0.8), (5000, 0.98), (8000, 0.6), (12000, 0.08),
             (16000, 0.1)]
    turn = lambda hz: np.arccos(np.clip(along(alike, hz), 0, 1)) / 2
    mid, side = filtered(pair, lambda hz: np.array([np.cos(turn(hz)), np.sin(turn(hz))]))
    return np.array([mid + side, mid - side])


def amp(db):
    """Decibels to an amplitude factor."""
    return 10 ** (np.asarray(db) / 20)


def unit(x):
    """Scale to rms 1."""
    return x / np.sqrt(np.mean(x ** 2) + 1e-20)


def along(points, hz):
    """Read a curve of (Hz, value) points on a log frequency axis."""
    f, v = np.transpose(points)
    return np.interp(np.log(hz + 1), np.log(f + 1), v)


def filtered(x, response):
    """Filter x by a complex response of frequency."""
    n = x.shape[-1]
    m = next_fast_len(n + SR // 8)
    return irfft(rfft(x, m) * response(np.fft.rfftfreq(m, 1 / SR)), m)[..., :n]


def add(track, sound, s):
    """Mix a sound into a track from s seconds on."""
    i = max(round(s * SR), 0)
    part = sound[..., :max(N - i, 0)]
    track[..., i:i + part.shape[-1]] += part


def limited(x, size=13):
    """A fast limiter holds both channels' peaks to 0.97, its gain smoothed over a few samples."""
    needed = 1 / np.maximum(np.abs(x).max(axis=0) / .97, 1)
    return x * uniform_filter1d(minimum_filter1d(needed, size), size)


def scene():
    """Pops, low thumps, peels, squelch, table and hiss together, ahead of the microphone."""
    grip = effort(SQUEEZES)
    bursts = pops(POPS + small_pops(grip)) + low_thumps()
    return bursts + peeling() + squeezing(grip) + table(grip) + background()


def record(dry):
    """The capsules differ in phase and level; the highest peaks are limited; then the band ends steeply."""
    # Phase between the capsules. Each row: frequency in Hz, radians by which left leads, ahead of
    # the easing towards the bass below.
    phase_lead = [(100, 3), (700, 0.14), (2000, 0.22), (4500, 1.04), (8000, .5), (9800, 0.78), (11500, 3),
                  (16000, 0.5)]
    # Level between the capsules. Each row: frequency in Hz, left minus right in dB.
    tilt = [(100, 0), (1000, 1.5), (4500, 0.5), (6500, 3), (8500, 0.5), (10300, -3.5), (11500, 7.5),
            (15000, -2)]
    top_hz = 16700
    half = np.array([[.5], [-.5]])  # each capsule takes half of the difference
    lead = lambda hz: along(phase_lead, hz) * hz / (hz + 100)
    heard = filtered(dry, lambda hz: amp(half * along(tilt, hz)) * np.exp(1j * half * lead(hz)))
    return filtered(limited(heard), lambda hz: np.clip((top_hz - hz) / 800 + .5, 0, 1))


dry = scene()
out = record(dry)
output_pcm(out)
```